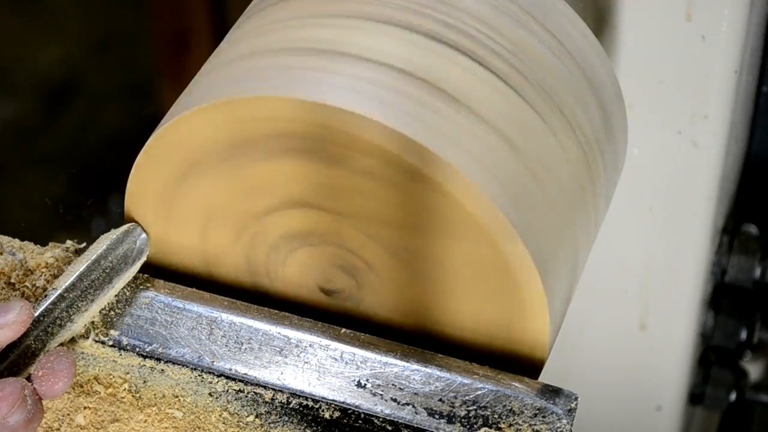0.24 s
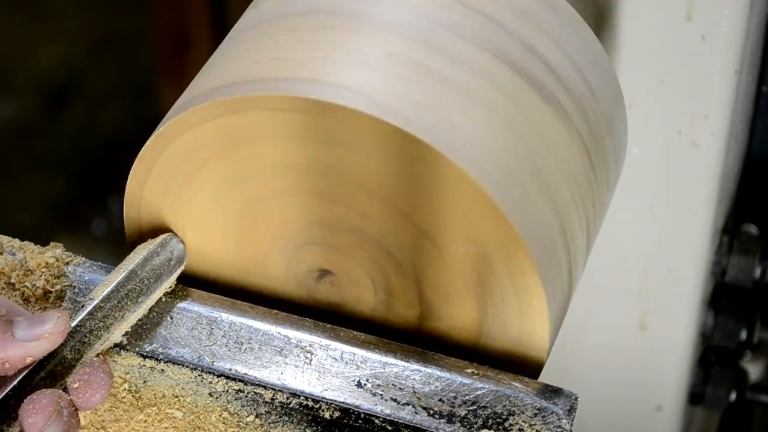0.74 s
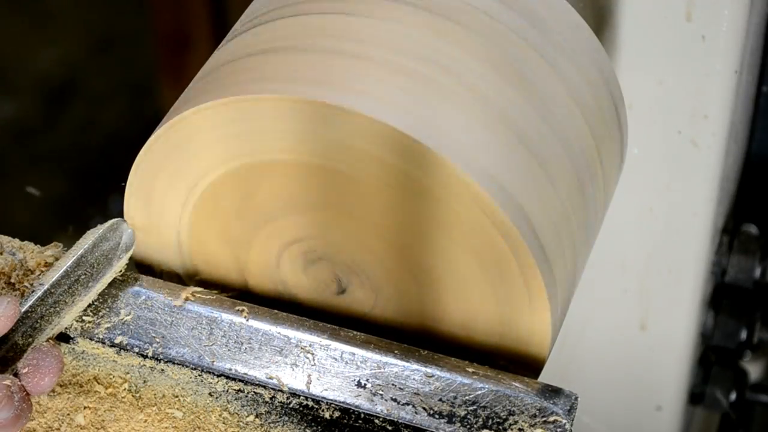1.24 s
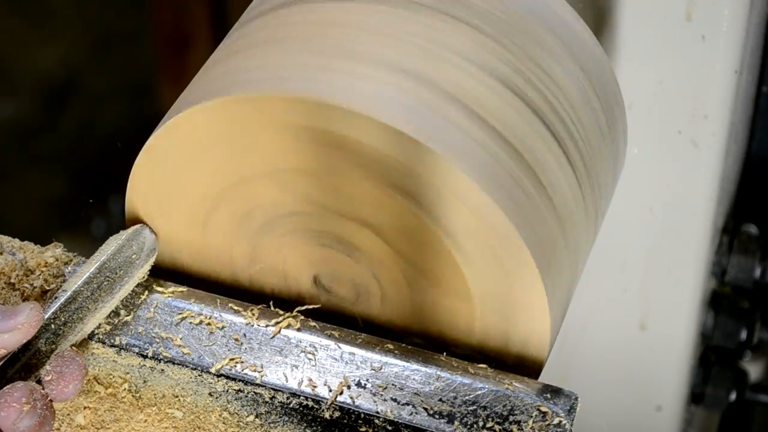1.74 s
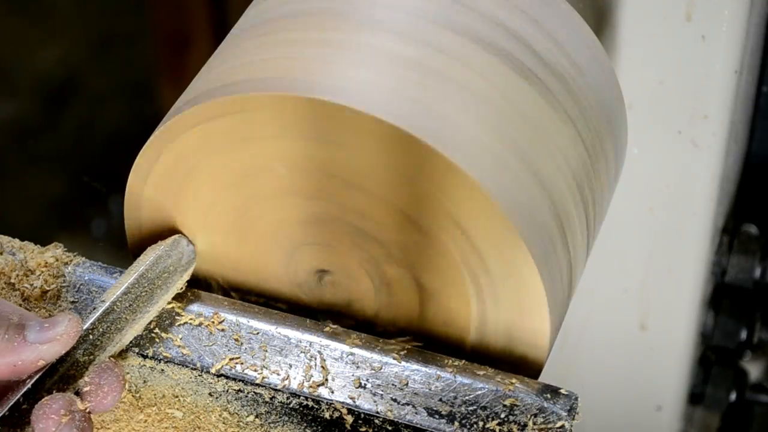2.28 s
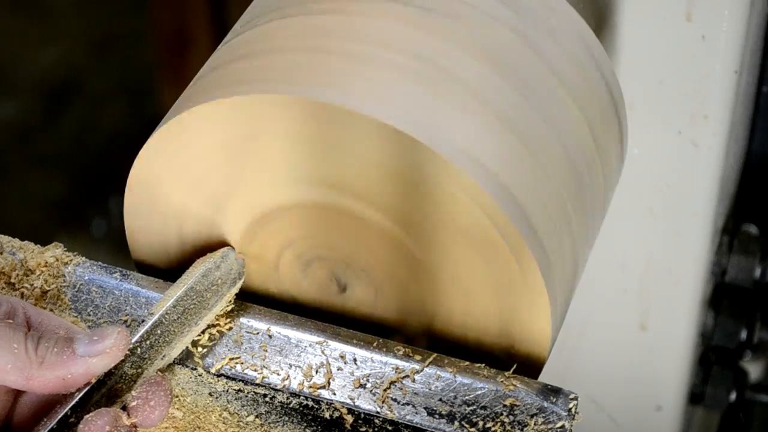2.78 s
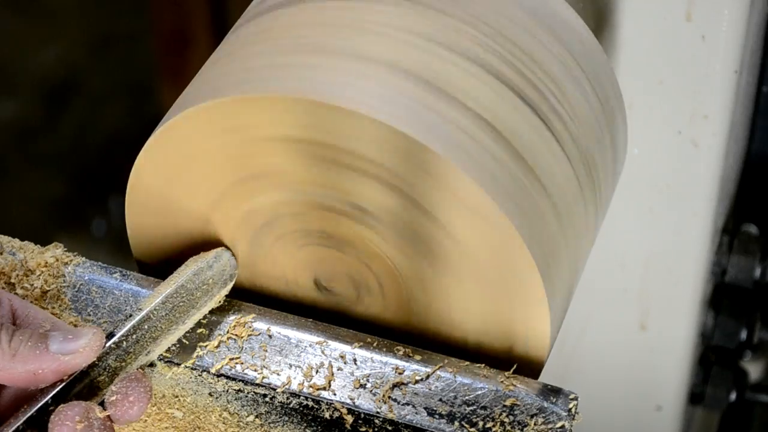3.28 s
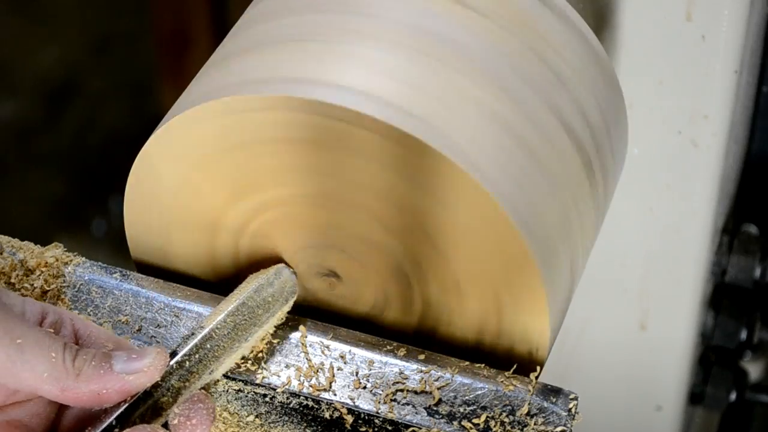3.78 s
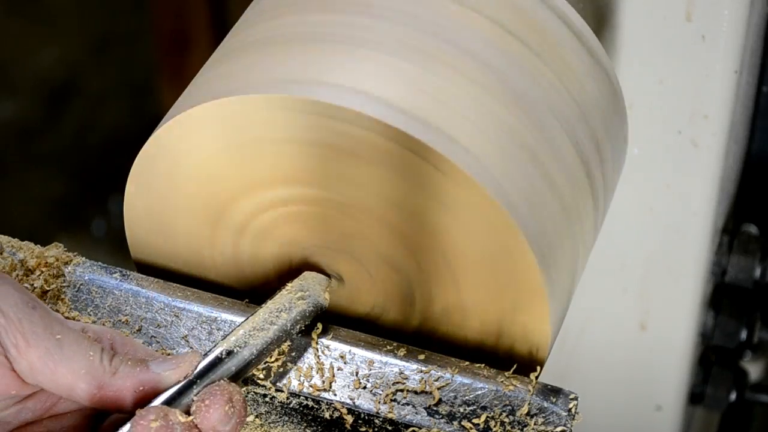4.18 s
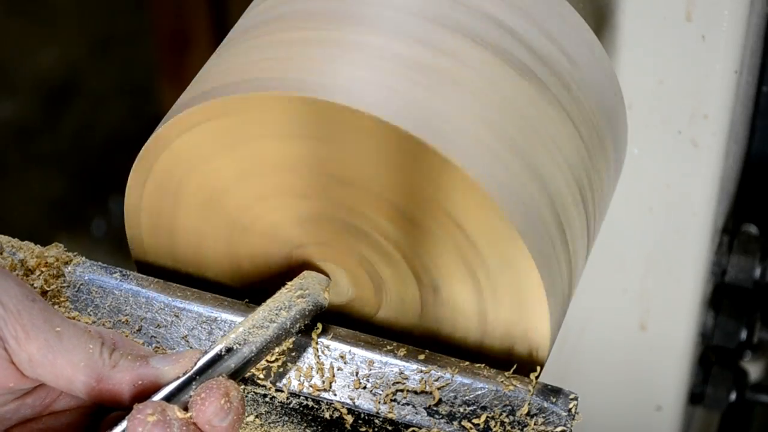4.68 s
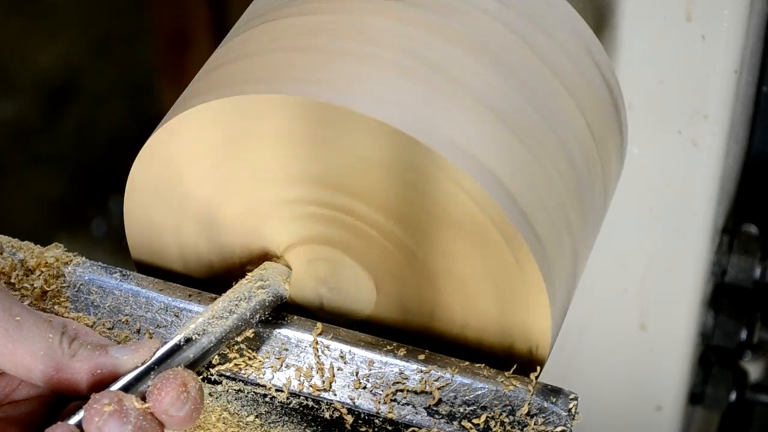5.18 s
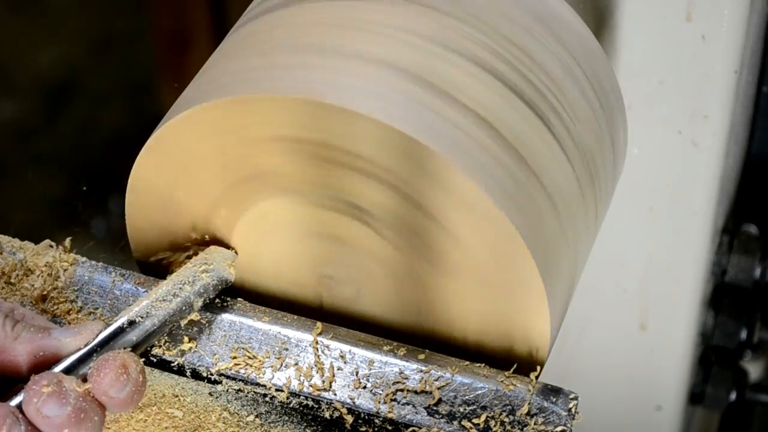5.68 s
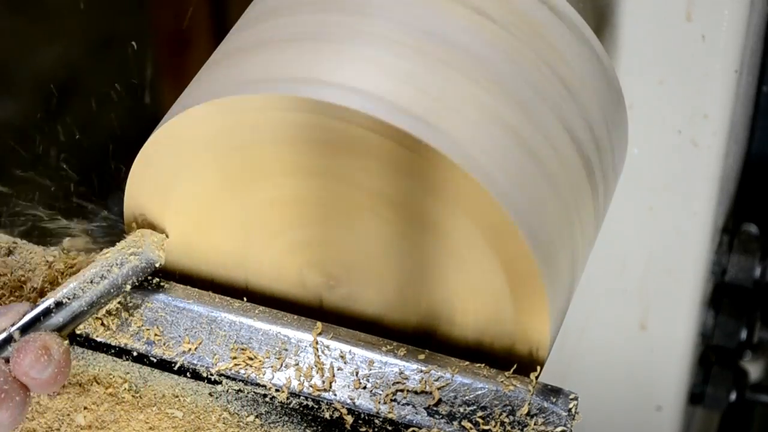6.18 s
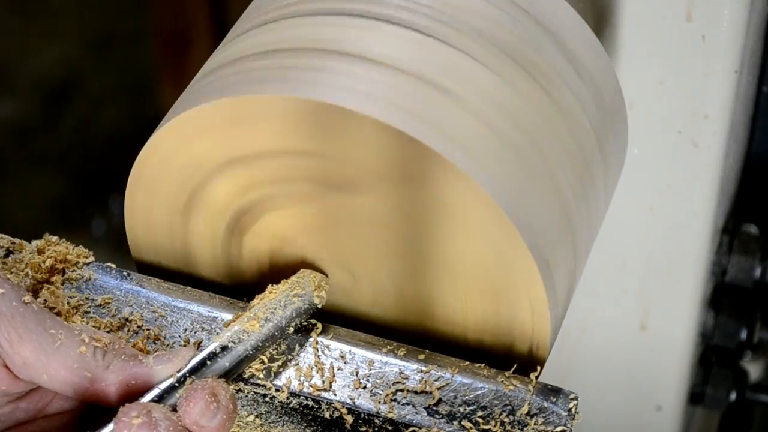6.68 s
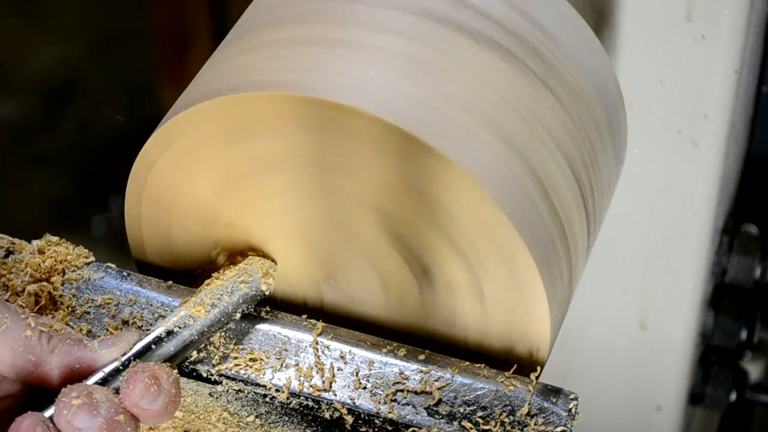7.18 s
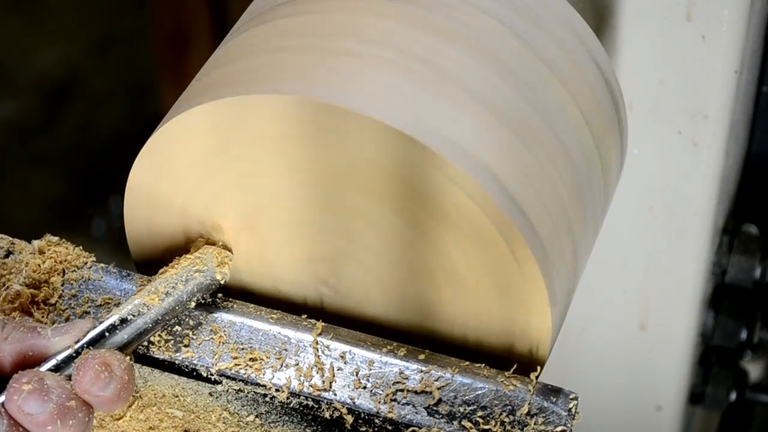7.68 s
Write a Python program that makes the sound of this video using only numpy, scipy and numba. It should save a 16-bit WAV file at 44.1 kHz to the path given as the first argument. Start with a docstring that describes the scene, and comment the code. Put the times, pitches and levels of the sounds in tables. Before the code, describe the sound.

Close, dry mono sound in a small workshop. A lathe whirs steadily with a thin singing tone and a fan whine. A gouge cuts a spinning blank in six passes: two long, bright, sizzling hisses, a brief burst, a faint touch, then a longer swelling scrape and a softer final cut. Each hiss flutters very fast with the wood's rotation.

```python
"""Turning wood on a lathe

A gouge takes six passes over the end of a spinning wooden blank, close to a small microphone.
The uneven face meets the edge for part of every turn, so the shavings hiss in bursts: noise shaped by
the cutting force and sent through filters that ring like steel. Tool rest and blank add lower rings.
Underneath, sine tones and filtered noise make the singing lathe drive and a whining dust extractor,
which sags in pitch near the end, along with a faint sliding hum and a smooth rush of air."""
import sys
import numpy as np
from scipy import signal
from scipy.fft import rfft, irfft
from scipy.io import wavfile
from scipy.ndimage import uniform_filter1d
from numba import njit

SR = 44100
rng = np.random.default_rng(int(sys.argv[2]) if len(sys.argv) > 2 else 0)


def to_wav(sig):
    """Store sig (one row per channel, or 1-D mono) as 16-bit WAV at the path in sys.argv[1].

    Samples outside -1..1 are clipped; the rate is SR.
    """
    pcm = np.clip(np.atleast_2d(sig), -1, 1) * 32767
    pcm = np.round(pcm).astype(np.int16)
    wavfile.write(sys.argv[1], SR, pcm.T)  # frames by channels


N = 350154
T = np.arange(N) / SR  # time in seconds

# Shop air and microphone noise. Each row: frequency in Hz, level in dB per Hz before the final filters.
AIR_SPECTRUM = [(20, -62), (45, -97.5), (120, -132), (200, -120), (500, -114), (900, -104), (1500, -97),
                (1900, -104), (3000, -95.5), (5800, -97), (6700, -105), (8300, -99), (10500, -104),
                (13500, -102), (16000, -107)]
# A faint hum that slides down. Each row: time in seconds, pitch in Hz, level in dB.
HUM_SLIDE = [(2.55, 365, -105), (2.8, 343, -93), (3.2, 312, -92), (3.65, 296, -98)]

# Extractor fan. Each row: time in seconds, whine pitch in Hz, whine level in dB,
# change of the overtones in dB.
FAN_COURSE = [(0, 1035, -63, -4), (1, 1031, -62, -3), (3, 1027, -63, 0), (6, 1022, -64, -2),
              (6.9, 1015, -66, -2), (7.05, 982, -71, 2), (7.94, 988, -71, 1)]
# Fan overtones. Each row: multiple of the whine pitch, level in dB before the change above.
FAN_OVERTONES = [(3.403, -75), (7.39, -72), (9, -71.5)]
# Breathy fan whistle. One row: multiple of the whine pitch, width of each of two filters in Hz, level in dB.
FAN_BREATH = (5.465, 60, -58)

# Lathe drive tones, many of them a turn rate apart. Each entry: pitch in Hz.
DRIVE_PITCHES = [237, 332, 478, 578, 1059, 2495, 2534, 2573, 2706, 2745, 2784, 3913, 4570, 4608, 6153, 7185,
                 14370]
# Strengths of the same tones. Each entry: middle level in dB.
DRIVE_LEVELS = [-86, -96, -94.5, -90, -76, -73.5, -61.5, -74, -78, -64.5, -78.5, -73.5, -74.5, -71.5, -76.5,
                -76.5, -80.5]
# Noise in the machine castings. Each row: centre in Hz, width of each of two filters in Hz, middle level in dB.
CASTING_NOISE = [(1356, 507, -63), (2548, 400, -63), (3366, 200, -74.5), (4710, 550, -63), (5450, 960, -58),
                 (7580, 1300, -67.5), (12350, 1700, -65)]
THROB_HZ, THROB_DEPTH = 23.5, 0.22  # middle rate, depth as a fraction of the level

TURN_HZ = 39.16  # turns of the blank per second
# Where the edge touches the wood. Each row: time in seconds, place it enters in turns,
# place it leaves in turns, bite at entry in dB, bite before exit in dB, rubbing out of the cut in dB.
# The dB values are relative to the plateau of the cut.
EDGE_CONTACT = [(0.5, 0.444, 0.82, -10, 4, -12), (0.9, 0.451, 0.792, 2, 1, -14),
                (1.34, 0.446, 0.76, -4, -2, -16), (1.5, 0.33, 0.873, -2, 6, -9),
                (2.25, 0.329, 0.87, 1, 7, -8), (2.65, 0.375, 0.862, 8, 6, -7),
                (2.85, 0.387, 0.825, 9, -3, -11), (3.05, 0.311, 0.809, -10, -6, -13),
                (3.92, 0.308, 0.796, 7, -7, -12), (4.05, 0.314, 0.711, -10, -7, -14),
                (4.3, 0.314, 0.711, -10, -7, -14), (4.6, 0.02, 0.72, 8, 8, 2), (5.5, 0.02, 0.72, 9, 8, 2),
                (6.2, 0.01, 0.684, 9, 9, -5), (6.8, 0.086, 0.759, 13, 6, -9), (7.2, -0.07, 0.714, 7, 10, 2),
                (7.85, -0.022, 0.681, 5, 6, -5)]
TICK_DB, TICK_TURNS = 3.5, 0.03  # snap on entry: power relative to the bite, fading time in turns

# Gouge ringing in the earlier passes. Each row: middle pitch in Hz, width in Hz, relative level in dB.
RINGS_EARLY = [(9430, 150, -8), (9690, 130, 3), (10400, 90, -2), (11050, 300, -5), (10600, 3200, -8),
               (12550, 400, -4), (13100, 240, 1), (14650, 420, 1), (14000, 5000, -7)]
# Gouge ringing in the later passes. Each row: middle pitch in Hz, width in Hz, relative level in dB.
RINGS_LATE = [(10600, 450, 1), (11300, 150, -2), (10900, 2600, -9), (12500, 500, -3), (14380, 300, 1),
              (14900, 700, -3), (14000, 5000, -8)]
RING_CHANGE_S = 4.5  # time of the change from the earlier to the later gouge rings
SPLIT_HZ = 11700  # border between the lower and upper hiss
# Narrow rings of the gouge shank. Each row: pitch in Hz, width in Hz, level in dB relative to the lower hiss.
SHANK_RINGS = [(2272, 30, -19), (4290, 30, -16), (4862, 25, -13), (9925, 45, -12)]
# Scraping sound. Each row: centre in Hz, width in Hz, relative level in dB.
SCRAPE_BANDS = [(5260, 160, 0), (6880, 340, -4), (7120, 250, -4.5), (8600, 2800, -9.5)]
# Drumming of the blank. Each row: centre in Hz, width of each of two filters in Hz, relative level in dB.
DRUM_BANDS = [(957, 250, 2.5), (1740, 600, -6), (796, 280, -20)]
CHATTER_HZ, CHATTER_WIDTH_HZ = 2814, 510
REST_HZ, REST_WIDTH_HZ = 623.6, 23
# A steadier second ring of the tool rest. One row: pitch in Hz, width in Hz, highest gain in dB.
REST_SECOND_RING = (705, 15, -86)

# How hard the edge cuts, one curve for each pass. Each row in a curve: time in seconds, hiss gain in dB.
PASS_PRESSURE = [
    [(.22, -61), (.33, -50), (.5, -47), (.72, -48), (.85, -46.5), (.98, -48), (1.17, -47), (1.335, -51)],
    [(1.53, -59), (1.65, -50.5), (1.97, -45.5), (2.1, -47), (2.2, -44.5), (2.28, -46), (2.36, -43.5),
     (2.5, -46.5), (2.72, -46), (2.85, -43.5), (3.0, -48), (3.15, -44), (3.3, -49.5), (3.37, -55.5)],
    [(3.858, -50), (3.9, -45), (4.02, -51), (4.13, -49.5), (4.24, -51.5)],
    [(4.7, -69), (4.87, -58), (4.92, -63)],
    [(5.2, -68), (5.37, -55.5), (5.7, -53), (6.0, -47), (6.55, -45.5), (6.66, -46), (6.76, -48.5),
     (6.82, -48), (6.851, -47.5)],
    [(7.17, -71), (7.3, -54), (7.55, -50), (7.94, -49)],
]
# Colour of each pass. Each row: upper over lower hiss in dB at the start, the same at the end,
# scrape gain over hiss gain in dB at the start, the same at the end.
PASS_COLOUR = [(6, 2, -13.5, -11), (0.5, 1, -13.5, -7), (-4, -4, -11, -4.5), (-4, -2, -14, -10),
               (-1, 2.5, -12, -23), (-4, 0.5, -18, -21)]
# Low tones of each pass, before catches and swells. Each row: tool rest gain in dB, drumming gain in dB,
# chatter gain in dB.
PASS_TONES = [(-92, -72, -66.5), (-87.5, -73.5, -65.5), (-88, -71.5, -65.5), (-72.5, -72, -67),
              (-76, -70, -63.5), (-74.5, -72, -61.5)]
TONE_ATTACK_S = 0.08
# The edge catches in the wood. Each row: middle time in seconds, bell spread in seconds,
# scrape rise in dB, drumming rise in dB, chatter rise in dB.
WOOD_CATCHES = [(.55, 0.07, 2.5, 5.5, 4), (.85, 0.05, 0.5, 4, 6), (1.87, 0.05, 1.5, 1, 1),
                (2.8, 0.074, 0, 12.5, 5.5), (3.15, .08, 1.5, 6.5, 6.5), (4.14, 0.054, 2, -1, 11.5),
                (4.8, .05, .1, 5, 3), (5.85, 0.17, -0.5, 0.8, 5), (6.1, .06, -1, 4, 2),
                (6.62, 0.055, 2, 2.5, 5), (7.22, 0.034, 3, 9.5, .1)]
# The tool rest sings up. Each row: middle time in seconds, bell spread in seconds, rise in dB.
REST_SWELLS = [(.85, 0.14, 14.5), (1.1, .1, 15), (3.0, .2, 5), (5.27, .07, 3.5), (5.7, 0.13, 7),
               (6.35, 0.16, 7.5), (7.8, .2, 4)]


def undb(db):
    """Turn dB into an amplitude factor."""
    return 10 ** (np.asarray(db) / 20)


def level(x, db):
    """Scale a sound so that its average (RMS) level has the given dB."""
    return x * undb(db) / np.sqrt(np.mean(x ** 2))


@njit
def svf(x, hz, width):
    """State-variable band-pass: two linked integrators ring at a centre that may move."""
    y, b, l = np.empty(len(x)), 0., 0.
    for i in range(len(x)):
        g, k = np.tan(np.pi * hz[i] / SR), width / hz[i]
        v = (b + g * (x[i] - l)) / (1 + g * (g + k))
        b, l, y[i] = 2 * v - b, l + 2 * g * v, k * v
    return y


def band(x, hz, width):
    """Band-pass with a fixed or moving centre."""
    return svf(x, hz + 0 * T, 1. * width)


def body(x, modes, order=1):
    """Resonances side by side with alternate signs; order is the number of filters in a row."""
    out = 0
    for k, (hz, width, db) in enumerate(modes):
        y = x
        for _ in range(order):
            y = band(y, hz, width)
        out = out + (-1) ** k * undb(db) * y
    return out


def walk(rate):
    """Smooth wandering: random levels held for 1 / rate seconds and smoothed twice; spread near 1."""
    hold = int(SR / rate)
    steps = np.repeat(rng.standard_normal(N // hold + 1), hold)
    smooth = uniform_filter1d(uniform_filter1d(steps, hold), hold)
    return 1.283 * smooth[:N]


def noise():
    """White noise, with equal strength at all pitches."""
    return rng.standard_normal(N)


def bumps(rows):
    """Bell-shaped rises in dB, summed; one output line for each rise column."""
    return sum(np.outer(db, np.exp(-.5 * ((T - s) / spread) ** 2)) for s, spread, *db in rows)


def air():
    """Broad, smooth rush of the shop: white noise with its spectrum reshaped."""
    hz, db = np.transpose(AIR_SPECTRUM)
    f = np.maximum(np.arange(N // 2 + 1) * SR / N, 1)
    shape = undb(np.interp(np.log(f), np.log(hz), db))
    return irfft(rfft(noise()) * shape, N) * np.sqrt(SR / 2)


def slide():
    """A faint, far hum, one sine, that swells up, sinks in pitch and stops."""
    s, hz, db = np.transpose(HUM_SLIDE)
    loudness = undb(np.interp(T, s, db, -200, -200))
    angle = 2 * np.pi * np.cumsum(np.interp(T, s, hz)) / SR
    return np.sqrt(2) * loudness * np.sin(angle)


def extractor():
    """Blade whine with thin overtones and a breathy whistle, all following the fan speed."""
    s, *columns = np.transpose(FAN_COURSE)
    hz, whine_db, overtone_db = (np.interp(T, s, c) for c in columns)
    angle = 2 * np.pi * np.cumsum(hz * (1 + .0007 * walk(11))) / SR
    tones = undb(whine_db + 1.5 * walk(17)) * np.sin(angle)
    for multiple, db in FAN_OVERTONES:
        tones += undb(db + overtone_db + 1.8 * walk(10)) * np.sin(multiple * angle)
    multiple, width, db = FAN_BREATH
    whistle = band(band(noise(), multiple * hz, width), multiple * hz, width)
    return np.sqrt(2) * tones + level(whistle, db)


def lathe():
    """Drive tones and bearing noise in the castings, throbbing together with the belt."""
    throb_hz = THROB_HZ * (1 + 0.031 * walk(2.09))
    throb = 1 + THROB_DEPTH * np.sin(2 * np.pi * np.cumsum(throb_hz) / SR)
    out = 0
    for hz, db in zip(DRIVE_PITCHES, DRIVE_LEVELS):
        loose = min(hz / 2400, 1)  # the lowest hum has the steadiest level
        angle = 2 * np.pi * np.cumsum(hz * (1 + .0006 * walk(15))) / SR
        loudness = undb(db + 1.5 * loose * walk(12)) * throb ** loose
        out = out + np.sqrt(2) * loudness * np.sin(angle)
    for hz, width, db in CASTING_NOISE:
        rumble = level(band(band(noise(), hz, width), hz, width), db)
        out = out + np.sqrt(throb) * undb(1.6 * walk(6)) * rumble
    return out


def contact():
    """Cutting force round each turn: a bite on entry, a plateau, a second bite in the end grain."""
    s, *columns = np.transpose(EDGE_CONTACT)
    enter, leave, entry_db, exit_db, rub_db = (np.interp(T, s, c) for c in columns)
    turns = (T * TURN_HZ - enter + .1) % 1 - .1  # turns since entry, from -0.1 to 0.9
    width = leave - enter
    touching = 1 / (1 + np.exp(-turns / .005)) / (1 + np.exp((turns - width) / .015))
    bite = undb(entry_db) ** 2 * np.exp(-np.maximum(turns, 0) / 0.14)
    tick = undb(TICK_DB) ** 2 * np.exp(-np.maximum(turns, 0) / TICK_TURNS)
    grain = undb(exit_db) ** 2 * np.exp(-.5 * ((turns - width + .12) / .06) ** 2)
    power = touching * (1 + bite * (1 + tick) + grain) + undb(rub_db) ** 2
    # dividing by the average over a turn keeps the mean power near 1
    return np.sqrt(power / uniform_filter1d(power, int(SR / TURN_HZ)))


def same_each_turn(keep):
    """Noise that partly repeats every turn: the edge meets the same ridges again."""
    back = np.zeros(round(SR / TURN_HZ) + 1)
    back[0], back[-1] = 1, -np.clip(keep, 0, .95)
    return irfft(rfft(noise()) / rfft(back, N), N)  # an echo fed back once a turn


def flute(force, modes):
    """Rings of the steel, each fed by its own fibres and swelling as the hand shifts; two pitch groups."""
    groups = np.zeros((2, N))
    for hz, width, db in modes:
        centre = hz * (1 + .003 * walk(3))
        swell = undb(db + 1.5 * walk(4))
        groups[int(hz > SPLIT_HZ)] += swell * band(force * noise(), centre, width)
    return np.array([level(group, 0) for group in groups])


def passes():
    """Gains of lower hiss, upper hiss, scrape, tool rest, blank and chatter; silent between passes."""
    gains = 0
    for curve, colour, tones in zip(PASS_PRESSURE, PASS_COLOUR, PASS_TONES):
        s, db = np.transpose(curve)
        hiss_db = np.interp(T, s, db)
        up_db = np.interp(T, s[[0, -1]], colour[:2])
        scrape_db = np.interp(T, s[[0, -1]], colour[2:])
        low_share = 1 / (1 + undb(up_db) ** 2)  # part of the hiss power
        onset = np.clip((T - s[0]) / TONE_ATTACK_S, 0, 1)
        rows = [undb(hiss_db) * np.sqrt(low_share),
                undb(hiss_db) * np.sqrt(1 - low_share),
                undb(hiss_db + scrape_db)]
        rows += [undb(tone) * onset for tone in tones]
        gains = gains + ((T >= s[0]) & (T <= s[-1])) * np.array(rows)
    gains[[2, 4, 5]] *= undb(bumps(WOOD_CATCHES))
    gains[3] *= undb(bumps(REST_SWELLS)[0])
    return uniform_filter1d(gains, SR // 200)  # 5 ms smoothing


def room_wash(near):
    """Bench and walls return a short wash: noise that fades by 60 dB in 79 ms."""
    t = np.arange(SR // 8) / SR
    wash = rng.standard_normal(len(t)) * np.exp(-np.log(1000) * t / 0.079)
    return undb(-14.0) * signal.fftconvolve(near, wash / np.linalg.norm(wash))[:N]


def gouge():
    """Fibres tear in uneven grains while the edge touches; steel, tool rest and blank ring during each pass."""
    force = contact() * undb(0.79 * walk(60) + 1.54 * walk(500))
    tear = force * undb(2.3 * np.minimum(rng.exponential(size=N), 5))  # rare strong grains
    early, late = flute(tear, RINGS_EARLY), flute(tear, RINGS_LATE)
    low, high = np.where(T < RING_CHANGE_S, early, late)
    low += sum(level(band(tear * noise(), hz, width), db) for hz, width, db in SHANK_RINGS)
    # the dB here are small trims; the pass gains set the loudness
    scrape = level(body(force * noise(), SCRAPE_BANDS), 2.84)
    rest = level(band(same_each_turn(0.84), REST_HZ, REST_WIDTH_HZ), 0.68)
    drum = level(body(force ** 0.51 * same_each_turn(0.43), DRUM_BANDS, order=2), 4.6)
    chatter = level(band(force * noise(), CHATTER_HZ, CHATTER_WIDTH_HZ), -0.29)
    gains = passes()
    near = np.sum(gains * [low, high, scrape, rest, drum, chatter], axis=0)
    hz, width, db = REST_SECOND_RING
    second_ring = level(band(same_each_turn(0.84), hz, width), db)
    near += np.minimum(gains[0] / undb(-62), 1) * second_ring  # full once the lower hiss gain reaches -62 dB
    return near + room_wash(near)


def scene():
    """All sources added into one channel."""
    return (air() + slide() + extractor() + lathe() + gouge())[None]


def record(dry):
    """The small microphone loses bass and the top is cut."""
    thin = signal.sosfilt(signal.butter(2, 180, "high", fs=SR, output="sos"), dry)
    # a very faint low pulse that follows the loudness of the cut
    low_pulse = signal.sosfilt(signal.butter(2, [15, 90], "band", fs=SR, output="sos"), thin ** 2)
    top_cut = signal.ellip(10, .2, 60, 15430, fs=SR, output="sos")  # low-pass at 15430 Hz
    return signal.sosfilt(top_cut, thin + undb(-10.5) * low_pulse)


dry = scene()
out = record(dry)
to_wav(out)
```